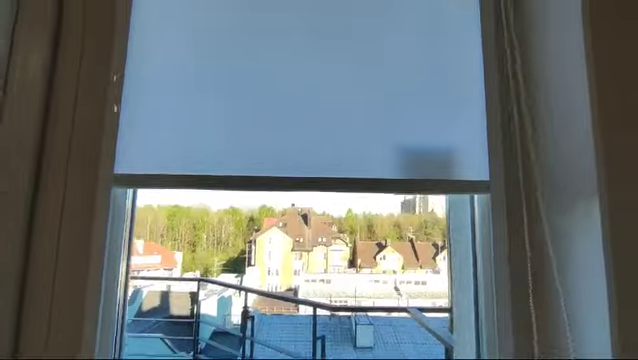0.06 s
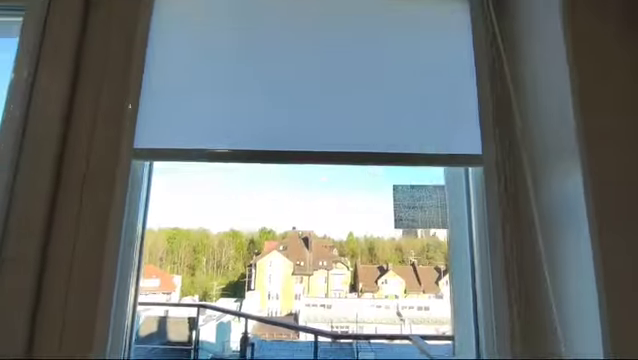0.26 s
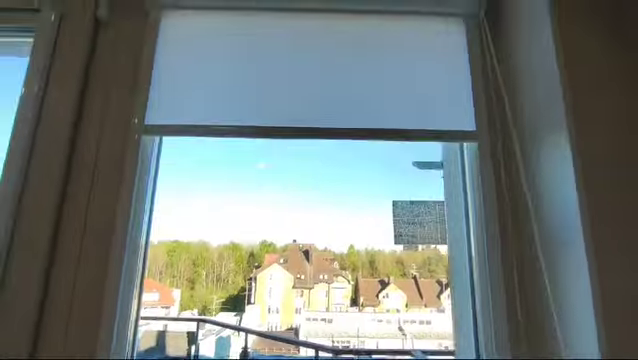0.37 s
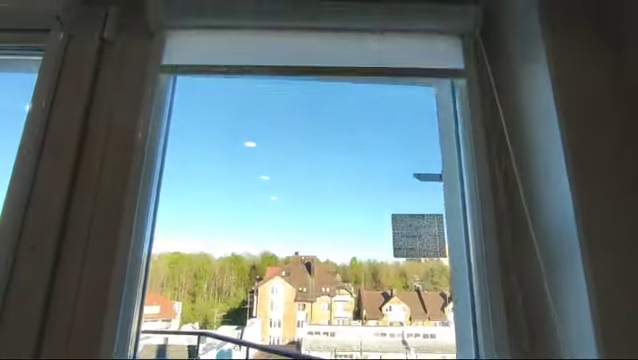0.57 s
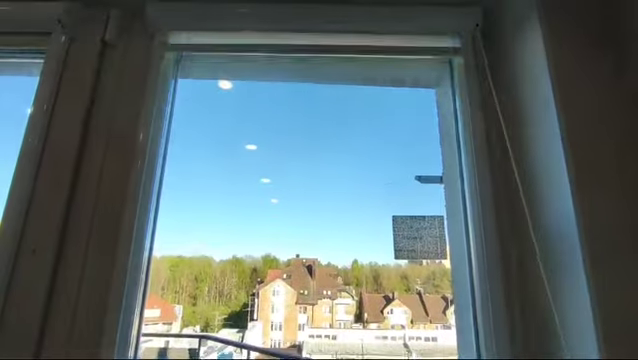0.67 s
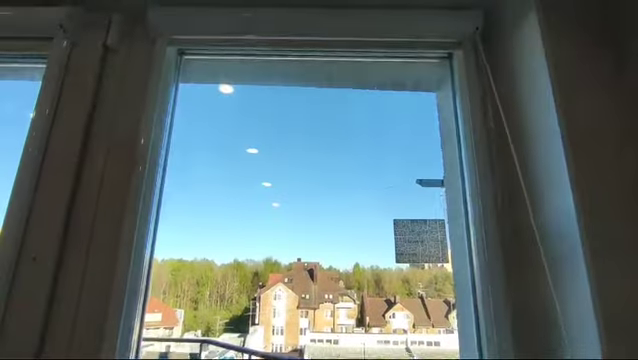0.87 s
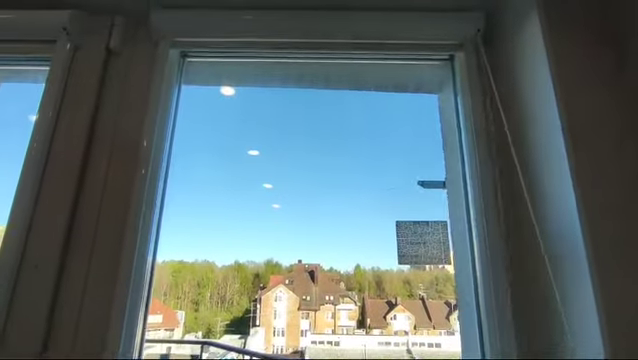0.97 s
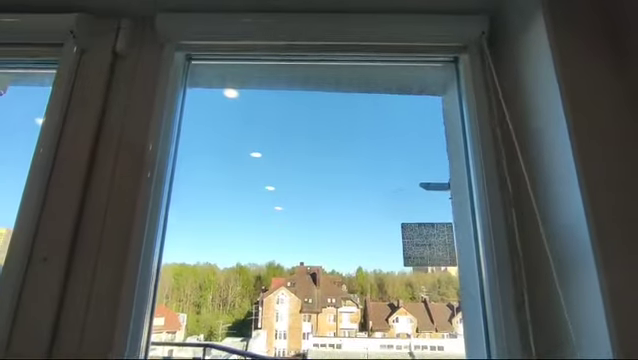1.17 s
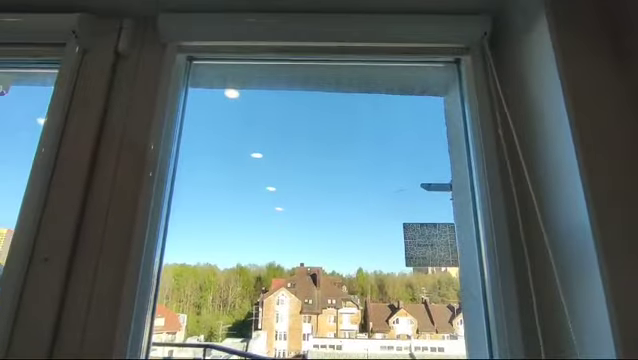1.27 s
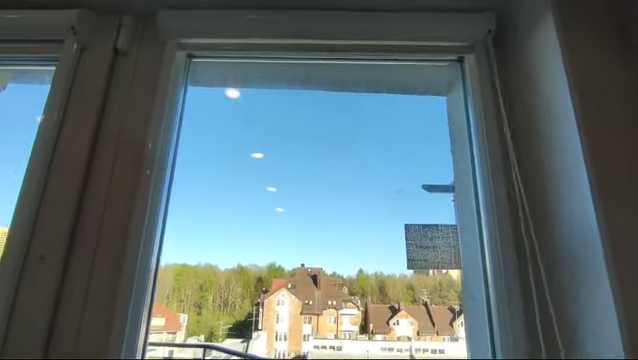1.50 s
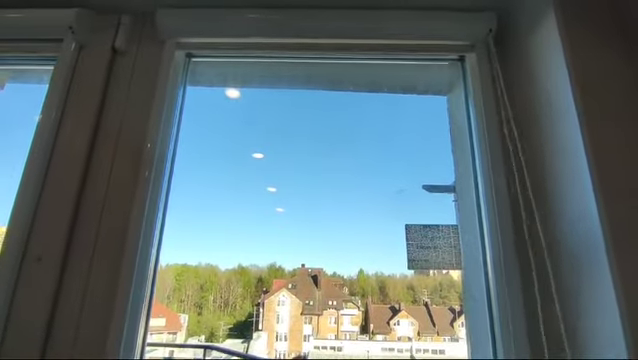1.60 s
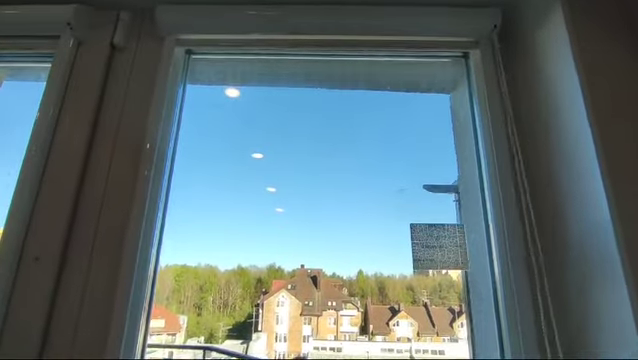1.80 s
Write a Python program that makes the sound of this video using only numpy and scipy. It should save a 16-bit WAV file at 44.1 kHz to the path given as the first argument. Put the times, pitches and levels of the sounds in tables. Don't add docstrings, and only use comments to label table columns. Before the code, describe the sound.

A spring roller blind shoots up by a window, clicks speeding into a rattling whir with bead chain ticks, then knocks at the top; echo fades, a faint settling tap follows, heard close in a quiet room.

```python
import sys
import numpy as np
from scipy import signal
from scipy.fft import rfft, irfft, next_fast_len
from scipy.io import wavfile
from scipy.ndimage import map_coordinates

SR = 44100
rng = np.random.default_rng(int(sys.argv[2]) if len(sys.argv) > 2 else 0)


def gain_from_decibels(decibels):
    exponent = np.asarray(decibels, float) / 20
    return 10 ** exponent


def transcribe(u):
    v = np.clip(np.atleast_2d(u).T, -1, 1)
    q = np.round(v * 32767).astype(np.int16)
    wavfile.write(sys.argv[1], SR, q)


N = 81585

# pitch_hz, density_db
HUSH_COLOUR = [(10, -17.5), (20, 5), (45, -5.5), (160, -19.5), (430, -28), (2000, -34.5), (5000, -42.5),
               (10000, -56), (13500, -48.5), (15800, -43)]
# pitch_hz, likeness_0_to_1
HUSH_ALIKE = [(30, 0.16), (70, 0.51), (140, 0.5), (500, 0.42), (1500, 0.041)]
# pitch_hz, lean_db
HUSH_LEAN = [(30, 3.5), (70, 3.5), (300, -1.5), (2000, 0), (8000, -2), (15000, 1)]

# start_s, level_db
SPIN_EFFORT = [(0, -67), (.014, -55.5), (.02, -64.5), (.12, -55), (.2, -46), (.29, -37.5), (.33, -33.5),
               (.39, -35), (.42, -36), (.46, -32), (.5, -31), (.56, -34), (.63, -35.5), (.72, -36.5)]
# pitch_hz, density_db
RATTLE_COLOUR = [(200, -26.5), (450, -24), (700, -18.5), (1500, -4.5), (2300, -8.5), (4300, -15.5),
                 (6800, -20.5), (8200, -11.5), (10000, -25.5), (15800, -30.5)]

# pitch_hz, t60_s
ROOM_DECAY = [(150, 0.9), (350, 0.87), (550, 0.87), (2000, 0.78), (6000, 0.72), (12000, 0.43)]
# pitch_hz, likeness_0_to_1
ROOM_ALIKE = [(100, 1), (300, 0.8), (600, 0.64), (1200, 0.004)]

# start_s, peak_db, t60_s
BEAD_TICKS = [(.0144, -68, 0.03), (0.081, -46, 0.025), (0.0965, -49.5, 0.028), (.14, -61, 0.023),
              (0.177, -45.5, 0.019), (.2055, -46, 0.03), (.223, -41, 0.026), (0.2402, -39, 0.03),
              (.258, -40, 0.026), (.28, -48, 0.022), (0.3068, -22.5, 0.087), (.36, -40, .03),
              (.394, -37, 0.027), (.445, -37, .02), (0.462, -34.5, 0.035), (0.486, -30, .04),
              (.498, -30, .02), (0.522, -28, 0.063), (0.548, -28, 0.022), (.615, -40, .02),
              (0.812, -29.5, 0.15), (0.88, -30, 0.13), (1.156, -59, 0.049), (1.2, -63, .04),
              (1.2426, -60, 0.052), (1.298, -61.5, 0.12), (1.317, -74, 0.053)]
# pitch_hz, density_db
BEAD_COLOUR = [(3000, -36), (5600, -20), (6800, -9), (7800, -2), (8700, -6), (10000, -16), (12500, -18),
               (15800, -21)]

# start_s, peak_db
PAWL_CATCHES = [(0.0224, -30.5), (0.0571, -29.5), (0.0992, -24.5), (0.1464, -25), (0.181, -23),
                (0.2059, -15.5), (0.2254, -17.5), (0.2445, -17.5), (0.2614, -26), (0.2775, -15.5),
                (.288, -26), (.301, -27), (.319, -22.5), (.332, -25), (.345, -30), (0.358, -19.5),
                (0.3722, -17.5), (.384, -31), (0.396, -16.5), (.419, -19), (.4465, -17.5), (0.465, -20),
                (.479, -26), (.492, -31), (.502, -22), (.523, -31), (.548, -29), (0.575, -21.5), (.6, -39),
                (.622, -33), (.646, -29)]
CHATTER_DB = [-14, -6.5, -2, -10.5]
# pitch_hz, width_hz, level_db
BRACKET_MODES = [(358, 30, -14), (655, 45, -2), (1550, 70, 0), (1800, 110, -3), (2120, 150, 3),
                 (2550, 400, -4), (3080, 200, -8), (5040, 600, -14), (8300, 1500, -21)]

# start_s, peak_db, crack_t60_s, ring_db
BAR_KNOCKS = [
    (0.8079, -18.5, 0.013, -17.5),
    (0.8121, -14.5, 0.024, -10.5),
    (0.8144, -26.5, 0.094, -19),
    (1.303, -48.5, .15, -30),
    (1.3167, -37, 0.052, -17),
    (1.3188, -34, 0.007, -30),
]
# pitch_hz, level_db, t60_s
BAR_MODES = [(213.4, -7.5, 0.13), (314.2, -6.5, 0.12), (461.6, -10, 0.11), (541, -2.5, 0.09),
             (608, 2.5, 0.11), (712, -2.5, 0.069), (974, -15, 0.03), (1270, -12, 0.13), (1534, -5, 0.16),
             (1760, 8.5, 0.011), (1945, -6, 0.13), (2550, -10, .05), (2805, 2, 0.041)]
# pitch_hz, density_db
BLOW_COLOUR = [(70, -48), (190, -11), (380, -14), (600, -7), (1200, -2.5), (2000, -4.5), (2900, -8.5),
               (4500, -18.5), (8300, -24.5), (15800, -58)]
# start_s, pitch_hz, level_db, t60_s
SINGLE_RINGS = [(1.33, 1790, -49, 0.12), (1.35, 1600, -48.5, 0.23), (0.52, 220, -50, 0.1),
                (0.58, 225, -51, 0.21), (.712, 212, -47.5, 0.38), (.245, 320, -47.5, 0.19),
                (0.97, 361, -37.5, .3), (.811, 196, -43, 0.079), (.82, 480, -36, 0.46),
                (.83, 1200, -39.5, 0.77)]
# start_s, pitch_hz, level_db, t60_s
FRAME_TAPS = [(.4368, 860, -14.5, 0.017), (.4405, 1039, -18.5, 0.047), (.443, 1270, -21, 0.03),
              (.4368, 666, -38, 0.026), (.812, 522, -19, 0.046), (.8125, 2780, -17.5, 0.028),
              (.816, 1760, -20, 0.046), (.819, 962, -24, 0.031), (1.306, 2710, -45, .05),
              (1.3165, 1760, -38.5, .05), (1.3175, 2203, -38.5, 0.042), (1.3175, 2665, -37.5, 0.034),
              (1.3175, 3150, -41, 0.022), (1.321, 1034, -44.5, 0.068), (1.318, 4220, -54, .05)]

# start_s, pitch_hz, level_db
GEAR_WHINE = [(.29, 1000, -50), (.36, 1160, -36), (.43, 1290, -52), (.475, 1395, -38), (.505, 1335, -31),
              (.54, 1320, -50), (.575, 1285, -32), (.612, 1230, -50), (.64, 1150, -32), (.68, 1020, -52)]

# start_s, level_db
RUSTLE = [
    (1.6, -74),
    (1.636, -73),
    (1.666, -58),
    (1.764, -55),
    (1.816, -52),
    (1.85, -52.5),
]
# pitch_hz, density_db
CLOTH_DULL = [(180, -35), (300, -13), (1450, -2), (2350, -12), (2550, -14.5), (8410, -15.5), (15800, -37)]
# pitch_hz, density_db
CLOTH_BRIGHT = [(180, -55), (300, -43), (411, -14), (942, -9), (1710, -11), (2550, -3), (9140, -11),
                (15800, -32)]

# pitch_hz, likeness_0_to_1
NEAR_ALIKE = [(300, 0.96), (1000, 0.12), (3000, 0.31), (8000, 0.5)]
# pitch_hz, lean_db
SCENE_LEAN = [(200, -0.5), (2400, 1.5), (4400, -3.5), (6000, -17), (8100, -28), (10500, -30.5),
              (12500, -6.5), (15500, -2.5)]


def unit(x):
    return x / np.sqrt(np.mean(x ** 2) + 1e-20)


def along(points, hz):
    f, v = np.transpose(points)
    return np.interp(np.log(hz + 1), np.log(f + 1), v)


def curves(rows):
    s, *cols = np.transpose(rows)
    return [np.interp(np.arange(N) / SR, s, c) for c in cols]


def wobble(rate):
    knots = rng.standard_normal(int(N * rate / SR) + 4)
    return map_coordinates(knots, [np.arange(N) * rate / SR])


def filtered(x, response):
    m = 2 * next_fast_len(N // 2 + SR // 4)
    return irfft(rfft(x, m) * response(np.fft.rfftfreq(m, 1 / SR)), m)[..., :N]


def causal(gain):
    cepstrum = irfft(np.log(gain + 1e-6))
    half = cepstrum.shape[-1] // 2
    fold = np.concatenate([[1], 2 * np.ones(half - 1), [1], np.zeros(half - 1)])
    return np.exp(rfft(cepstrum * fold))


def coloured(x, spectrum):
    return filtered(x, lambda hz: causal(unit(gain_from_decibels(along(spectrum, hz)))))


def paired(pair, alike):
    def mix(hz):
        turn = np.arccos(np.clip(along(alike, hz), -1, 1)) / 2
        return np.array([np.cos(turn), np.sin(turn)])
    mid, side = filtered(pair, mix)
    return np.array([mid + side, mid - side])


def leaning(x, lean):
    def sides(hz):
        right = 1 / (1 + gain_from_decibels(2 * along(lean, hz)))
        return causal(np.sqrt(2 * np.array([1 - right, right])))
    return filtered(x, sides)


def near_noise():
    return paired(rng.standard_normal((2, N)), NEAR_ALIKE)


def strike(start_s, db, t60, rise_s):
    age = np.maximum(np.arange(N) / SR - start_s, 0)
    return gain_from_decibels(db - 60 * age / t60) * (1 - np.exp(-age / rise_s))


def bursts(rows, rise_s):
    return near_noise() * sum(strike(s, db, t60, rise_s) for s, db, t60 in rows)


def rings(rows, rise_s):
    age = lambda s: np.maximum(np.arange(N) / SR - s, 0)
    return sum(strike(s, db, t60, rise_s) * np.sin(2 * np.pi * hz * age(s)) for s, hz, db, t60 in rows)


def hush():
    pair = coloured(paired(rng.standard_normal((2, N)), HUSH_ALIKE), HUSH_COLOUR)
    return gain_from_decibels(-49) * leaning(pair, HUSH_LEAN)


def roller():
    grains_per_s, spread_db, flutter_db, stop_s = 1100, 12, 3, 0.68
    effort_db, = curves(SPIN_EFFORT)
    draw = rng.random((2, N))
    grains = (draw[0] < grains_per_s / SR) * gain_from_decibels(spread_db * 2 * draw[1])
    grains = unit(unit(grains) + 1.21 * near_noise())
    running = 1 / (1 + np.exp(np.clip((np.arange(N) / SR - stop_s) / 0.037, -50, 50)))
    rattle = coloured(grains * gain_from_decibels(flutter_db * wobble(70.43)), RATTLE_COLOUR)
    return rattle * gain_from_decibels(effort_db - 1) * running


def room(x):
    delay_s, stretch_s = 0.004, 0.11
    step = round(stretch_s * SR)
    wet = np.zeros((2, N + 3 * SR))
    late = np.pad(x, (round(delay_s * SR) + step, 2 * step))
    for k in range(0, N + step, step):
        hz, t, z = signal.stft(rng.standard_normal((2, SR * 3 // 4)), SR, nperseg=256)
        decay = gain_from_decibels(-60 * t / along(ROOM_DECAY, hz)[:, None])
        tail = signal.istft(z * decay, SR, nperseg=256)[1]
        stretch = late[k:k + 2 * step] * np.hanning(2 * step)
        piece = signal.fftconvolve(stretch[None], tail / np.linalg.norm(tail[0]), axes=1)
        wet[:, k:k + piece.shape[1]] += piece
    return paired(wet[:, step:step + N], ROOM_ALIKE)


def chain():
    ticks = [(s, db - 2.5, t60) for s, db, t60 in BEAD_TICKS]
    return coloured(bursts(ticks, rise_s=1 / 2500), BEAD_COLOUR)


def bracket(f):
    soft_hz = 8300
    body = 0
    for k, (centre, width, db) in enumerate(BRACKET_MODES):
        damping = 1j * f * width
        body = body + (-1) ** k * gain_from_decibels(db) * damping / (centre * centre - f * f + damping)
    return body / (1 + 1j * f / soft_hz) ** 2


def pawl():
    spacing_s = 0.0022
    blows, t = np.zeros(N), np.arange(N) / SR
    count = len(CHATTER_DB)
    draw = rng.random((len(PAWL_CATCHES), count, 2))
    for (s, db), row in zip(PAWL_CATCHES, draw):
        at = s + spacing_s * (np.arange(count) - 1.5 + 0.71 * row[:, 0])
        blows[np.round(at * SR).astype(int)] = gain_from_decibels(db + np.array(CHATTER_DB) + 3.3 * row[:, 1])
    puffs = sum(gain_from_decibels(db) * np.exp(-((t - s) / 0.0038) ** 2) for s, db in PAWL_CATCHES)
    grit = gain_from_decibels(-17) * near_noise() * puffs
    return gain_from_decibels(19) * filtered(blows + grit, bracket)


def bar():
    crack = coloured(bursts([k[:3] for k in BAR_KNOCKS], 0.00087), BLOW_COLOUR)
    modes = []
    for s, db, _, ring_db in BAR_KNOCKS:
        modes += [(s, hz, db + ring_db + level, t60) for hz, level, t60 in BAR_MODES]
    settling = rings(SINGLE_RINGS, 0.0063) * gain_from_decibels(3.3 * wobble(39.95))
    ring = rings(modes, 0.0025) + settling + rings(FRAME_TAPS, 0.0019)
    unsent_s = [BAR_KNOCKS[k][0] for k in (0, 2, 3, 5)]
    blows = np.zeros(N)
    for s, db, *_ in BAR_KNOCKS:
        blows[round(s * SR)] = gain_from_decibels(db + 20) * (s not in unsent_s)
    return crack + ring, coloured(blows, BLOW_COLOUR) + gain_from_decibels(-6) * ring


def gear():
    jitter_hz, flutter_db, overtone_db = 12, 2.2, -12
    hz, whine_db = curves(GEAR_WHINE)
    turn = 2 * np.pi * np.cumsum(hz + jitter_hz * wobble(89.7)) / SR
    first_s, last_s = GEAR_WHINE[0][0], GEAR_WHINE[-1][0]
    on = np.interp(np.arange(N) / SR, [first_s - .04, first_s, last_s, last_s + 0.063], [0, 1, 1, 0])
    tone = np.sin(turn) + gain_from_decibels(overtone_db) * (np.sin(1.3 * turn) + np.sin(2 * turn))
    return on * gain_from_decibels(whine_db + flutter_db * wobble(79.5)) * tone


def cloth():
    bright_from_s, bright_at_s = 1.676, 1.822
    level_db, = curves(RUSTLE)
    t = np.arange(N) / SR
    bright = np.clip((t - bright_from_s) / (bright_at_s - bright_from_s), 0, 1)
    dull = coloured(rng.standard_normal((2, N)), CLOTH_DULL)
    crisp = coloured(rng.standard_normal((2, N)), CLOTH_BRIGHT)
    start = np.clip((t - RUSTLE[0][0]) / 0.039, 0, 1)
    swell = start * gain_from_decibels(level_db + 5.5 + 1.25 * wobble(40.46))
    return swell * ((1 - bright) * dull + bright * crisp)


def scene():
    left_lag_s = np.array([[0.00033], [0]])
    spin, ticks, clicks, whine = roller(), chain(), pawl(), gear()
    hits, blows = bar()
    from_right = filtered(clicks + spin, lambda hz: np.exp(-2j * np.pi * hz * left_lag_s))
    direct = from_right + whine + hits + ticks
    sent = gain_from_decibels(-4) * clicks[1] + gain_from_decibels(-1) * spin[1] + gain_from_decibels(-6) * whine + blows + gain_from_decibels(-11.5) * ticks[1]
    heard = direct + gain_from_decibels(2.5) * room(sent) + cloth()
    return leaning(heard, SCENE_LEAN) + hush()


def band_limit(x):
    return signal.sosfilt(signal.butter(12, 16470, fs=SR, output="sos"), x)


def record(dry):
    top_hz = 15780
    mix = filtered(dry, lambda hz: hz < top_hz)
    return band_limit(mix)


dry = scene()
out = record(dry)
transcribe(out)
```